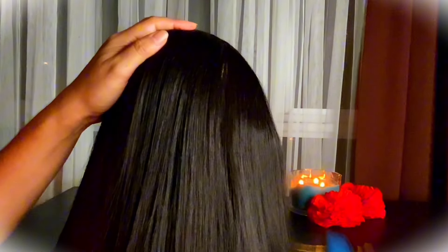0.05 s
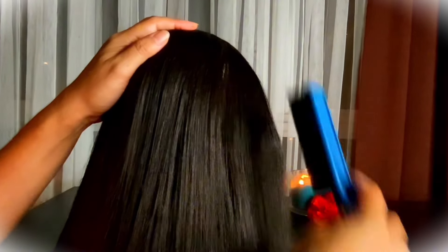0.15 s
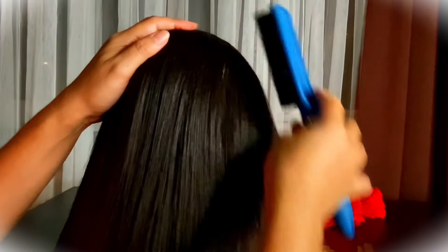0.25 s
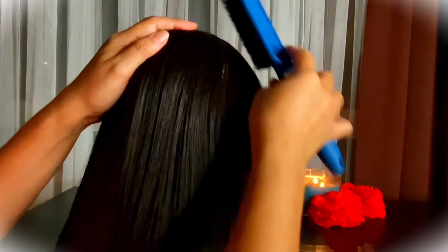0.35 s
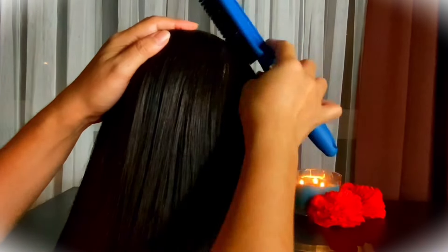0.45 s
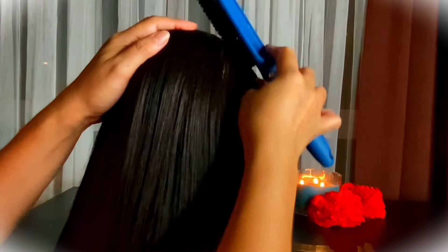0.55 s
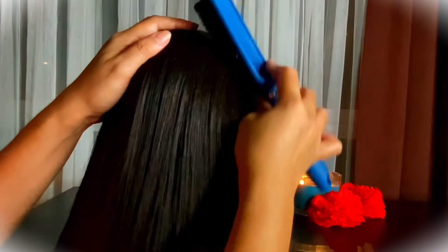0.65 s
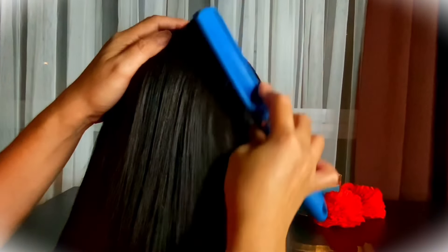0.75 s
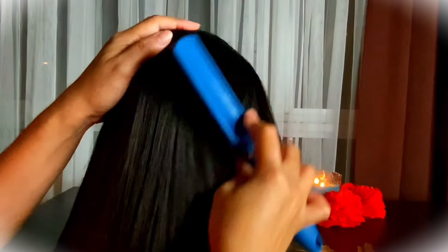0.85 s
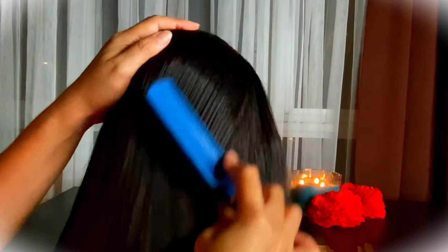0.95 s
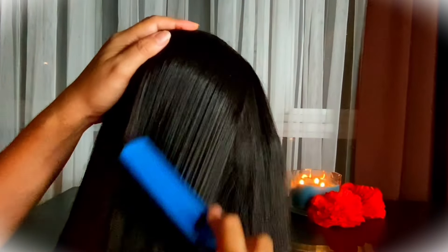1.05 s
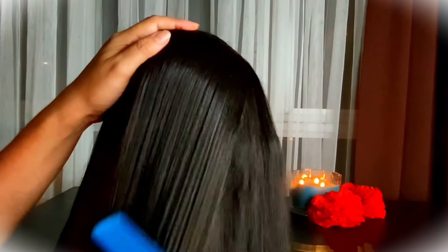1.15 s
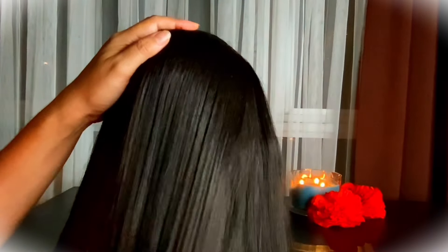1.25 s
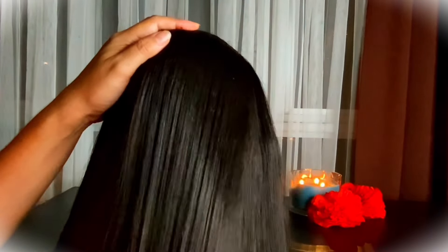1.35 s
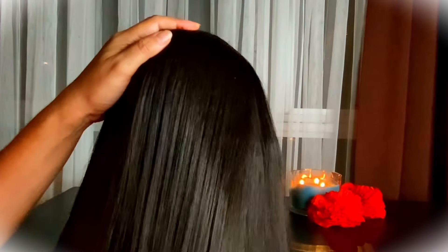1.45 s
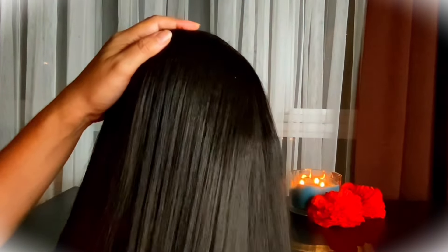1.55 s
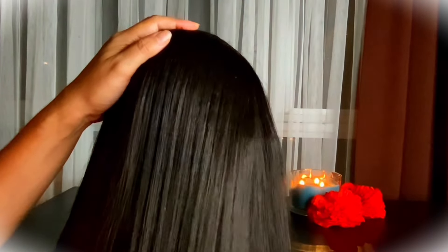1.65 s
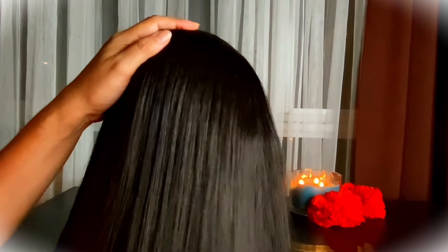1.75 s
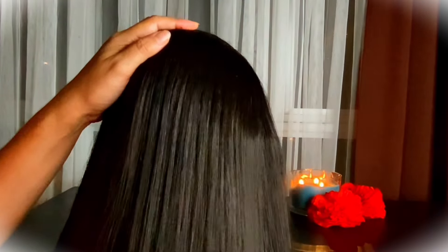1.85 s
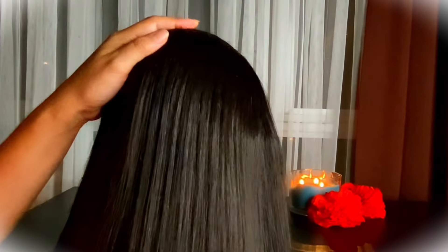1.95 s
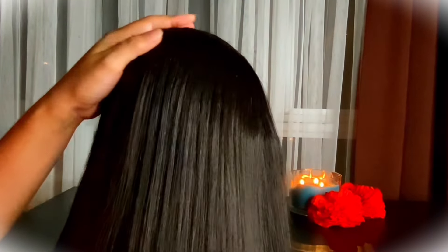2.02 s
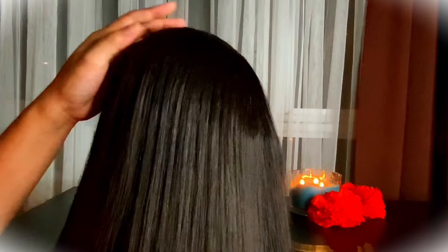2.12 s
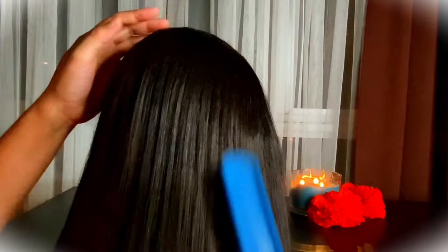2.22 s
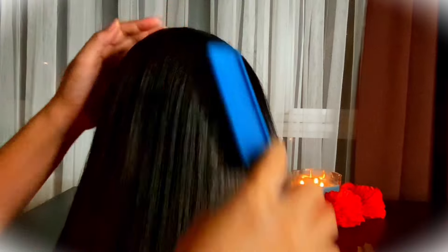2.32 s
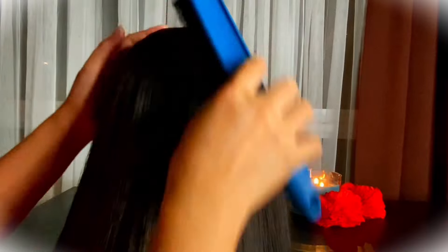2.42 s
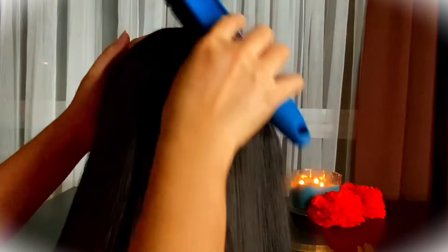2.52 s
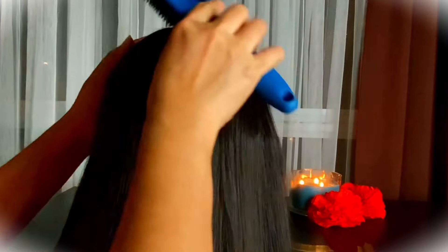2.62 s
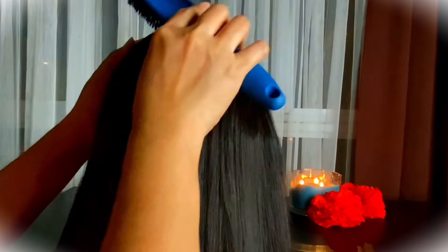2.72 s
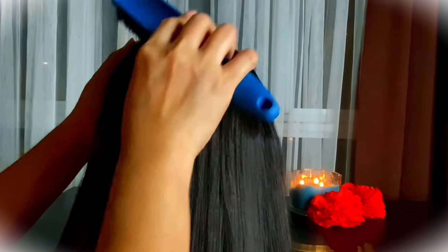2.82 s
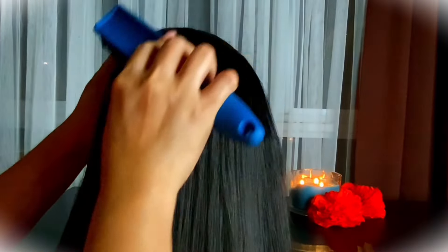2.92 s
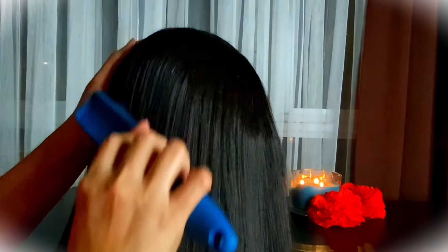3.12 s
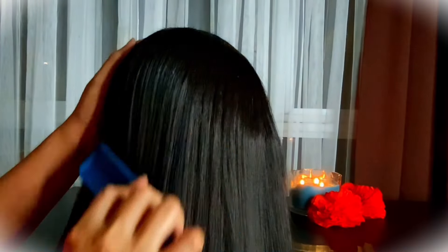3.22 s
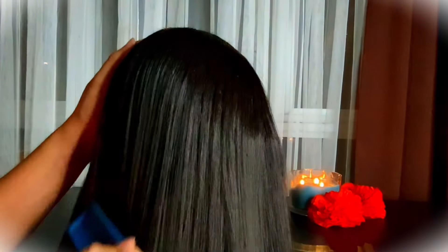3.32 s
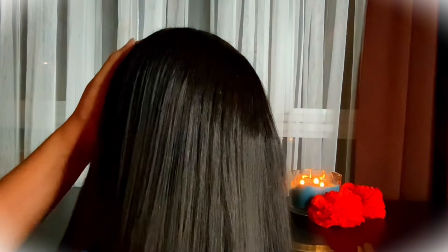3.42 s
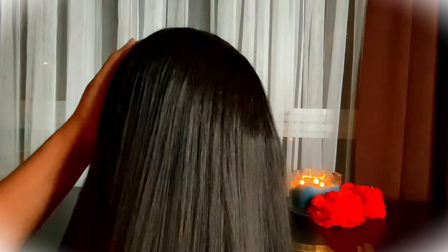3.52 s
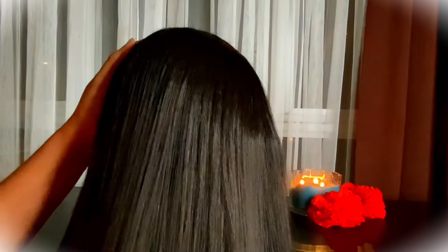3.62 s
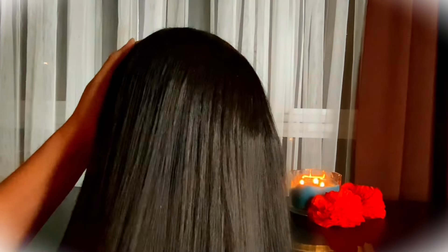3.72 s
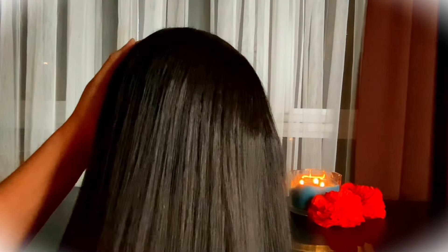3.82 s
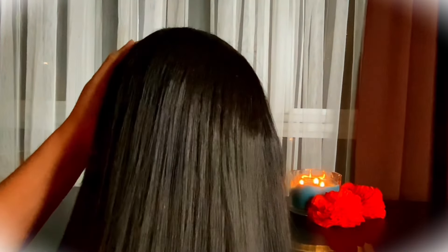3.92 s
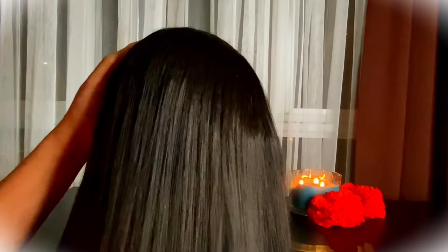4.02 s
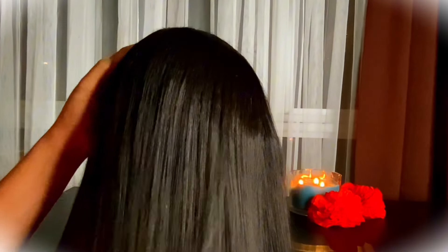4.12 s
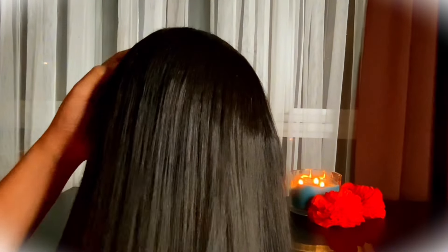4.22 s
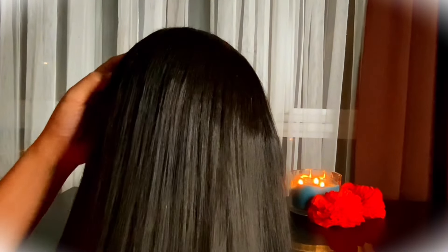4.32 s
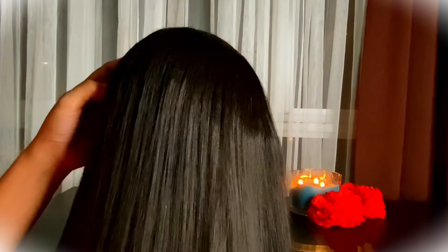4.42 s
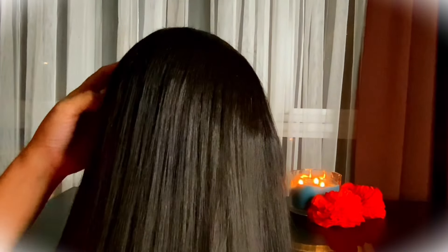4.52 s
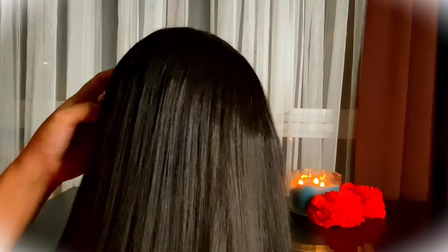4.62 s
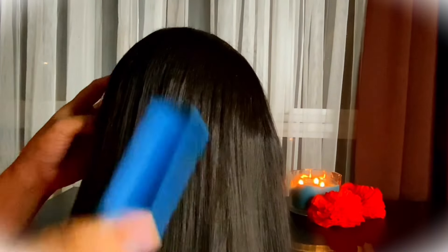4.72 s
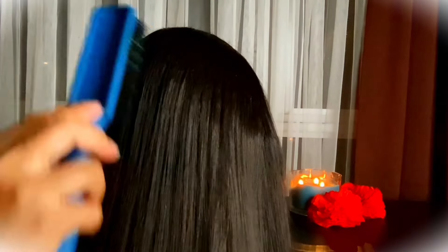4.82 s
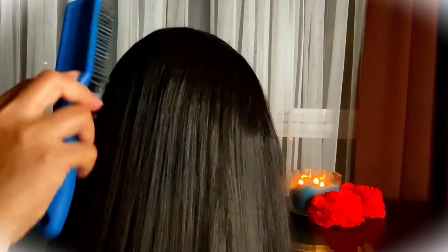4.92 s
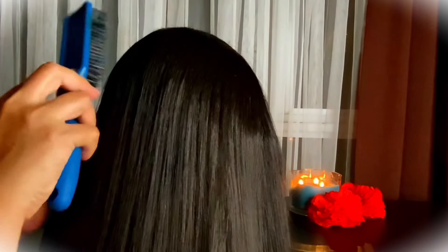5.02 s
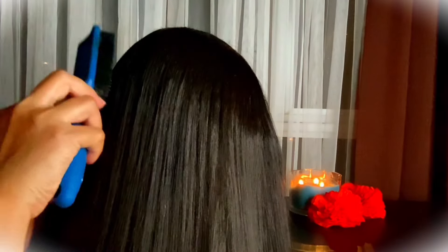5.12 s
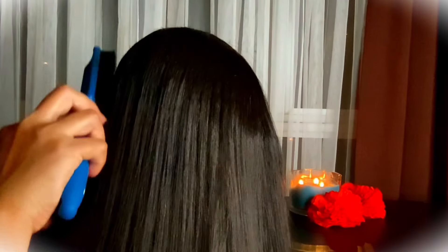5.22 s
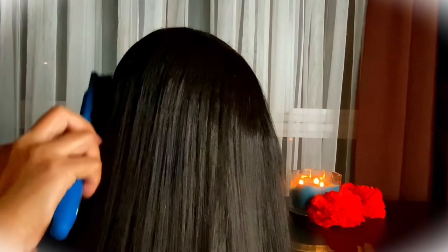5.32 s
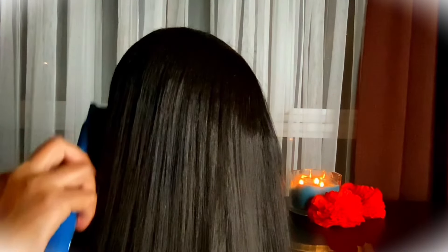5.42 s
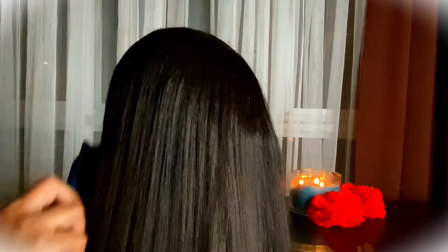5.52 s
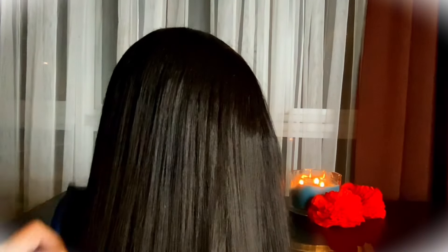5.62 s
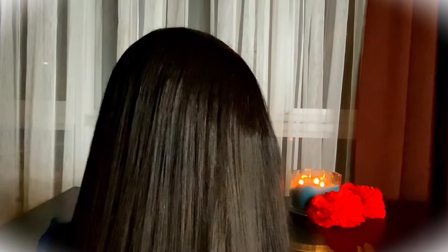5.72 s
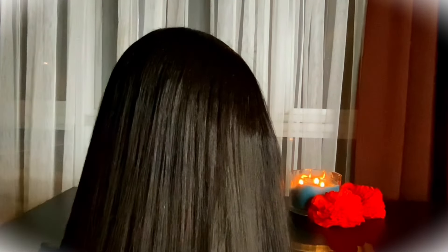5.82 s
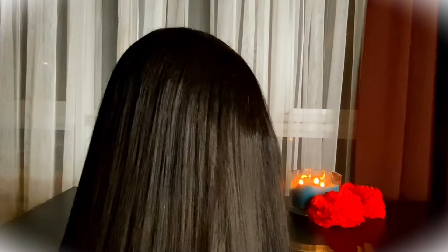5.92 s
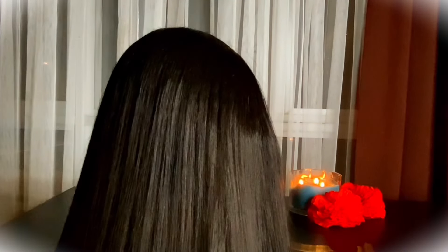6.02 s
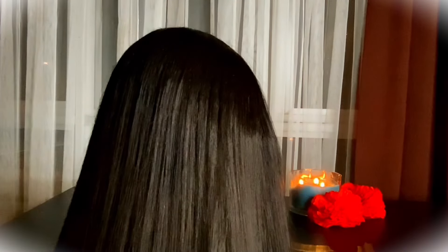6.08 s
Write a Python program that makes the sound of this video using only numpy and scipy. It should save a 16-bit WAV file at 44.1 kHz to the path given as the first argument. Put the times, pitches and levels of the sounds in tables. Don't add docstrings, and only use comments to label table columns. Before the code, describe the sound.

Close stereo hair brushing: a crackly scrape and swish with low thumps, then gentler strokes and tiny plastic knocks over faint hiss and rumble.

```python
import sys
import numpy as np
from scipy import signal
from scipy.fft import rfft, irfft, next_fast_len
from scipy.io import wavfile
from scipy.ndimage import uniform_filter1d, map_coordinates

SR = 44100
rng = np.random.default_rng(int(sys.argv[2]) if len(sys.argv) > 2 else 0)


def transcribe(u):
    v = np.clip(np.atleast_2d(u).T, -1, 1)
    q = np.round(v * 32767).astype(np.int16)
    wavfile.write(sys.argv[1], SR, q)


def decibels_to_gain(level_db):
    exponent = np.asarray(level_db, float) / 20
    return 10 ** exponent


N = 271215


def unit(x):
    return x / np.sqrt(np.mean(x ** 2) + 1e-20)


def curves(rows):
    s, *columns = np.transpose(rows)
    return [np.interp(np.arange(N) / SR, s, column) for column in columns]


def wobble(rate):
    knots = rng.standard_normal(int(N * rate / SR) + 4)
    return map_coordinates(knots, [np.arange(N) * rate / SR])


def filtered(x, response):
    m = next_fast_len(N + SR // 2)
    return irfft(rfft(x, m) * response(np.fft.rfftfreq(m, 1 / SR)), m)[..., :N]


def colour(points):
    f, db = np.transpose(points)
    return lambda hz: decibels_to_gain(np.interp(np.log(hz + 1), np.log(f + 1), db, -120, -120))


def bell(f, centre_hz, width_hz):
    return 1 / (1 + ((f - centre_hz) / width_hz) ** 2)


def modes(rows):
    def response(f):
        total = 0
        for k, (centre, width, db) in enumerate(rows):
            ring = 1j * f * width / (centre * centre - f * f + 1j * f * width)
            total = total + (-1) ** k * decibels_to_gain(db) * ring
        return total
    return response


def ears(pair, alike, pan_db):
    turn = np.arccos(np.clip(alike, -.98, .98)) / 2
    mid, side = np.cos(turn) * pair[0], np.sin(turn) * pair[1]
    gains = decibels_to_gain(np.array([pan_db, -pan_db]) / 2)
    return np.array([mid + side, mid - side]) * gains / np.sqrt((gains ** 2).mean(axis=0))


def slips(rate, spread_db, life, grit, floor):
    chance, size = rng.random((2, N))
    kicks = (chance < rate / SR) * decibels_to_gain(-spread_db * np.log(size + floor))
    return 1 + np.clip(grit, 0, 2) * signal.lfilter([1], [1, -np.exp(-1 / (life * SR))], kicks)


def patches(x, depth_db):
    z = signal.stft(x, nperseg=512)[2]
    field = uniform_filter1d(rng.standard_normal(z.shape[1:]), size=8, axis=0)
    field = uniform_filter1d(field, size=8, axis=1)
    return signal.istft(z * decibels_to_gain(depth_db * unit(field)), nperseg=512)[1][:, :N]


def swells(rows, sharp=1.67):
    t = np.arange(N) / SR
    shapes = []
    for s, length, *_ in rows:
        phase = np.clip((t - s) / length, -.5, .5)
        shapes.append(np.abs(np.cos(np.pi * phase)) ** sharp)
    shapes = np.array(shapes)
    return decibels_to_gain([row[2] for row in rows]) @ shapes, np.array([row[3] for row in rows]), shapes


def add_at(track, start_s, burst):
    first = round(start_s * SR)
    track[:, first:first + burst.shape[-1]] += burst


# pitch_hz, density_db (per Hz)
ROOM_RUMBLE = [(12, -29), (20, -9.5), (81, -6), (116, -25), (210, -24), (241, -23), (388, -29.5),
               (513, -36.5)]
# pitch_hz, density_db (per Hz)
CAPSULE_HISS = [(802, -37), (1480, -42.5), (2020, -44), (13500, -48.5), (16000, -45.5)]


def room():
    noise = patches(rng.standard_normal((2, N)), depth_db=0.9)
    hush = unit(filtered(noise, colour(ROOM_RUMBLE + CAPSULE_HISS)))
    return ears(decibels_to_gain(-53.5) * hush, 0.042, np.full(N, 0.34))


# start_s, pull_db, scalp_db
STROKE_FORCE = [
    [(0.5, -40, -62), (0.508, -43.5, -64.5), (0.604, -49.5, -50.5), (0.678, -47, -50), (0.69, -50, -49.5),
     (0.776, -47, -49.5), (0.93, -44, -50.5), (1.0, -33, -56.5)],
    [(1.0, -34, -60), (1.01, -34, -61), (1.162, -22, -44), (1.3, -28.5, -52.5), (1.348, -22, -45.5),
     (1.588, -35.5, -63), (1.634, -34.5, -62), (1.9, -53.5, -97)],
    [(2.62, -56, -83), (2.678, -56, -68.5), (2.766, -59, -68), (2.784, -50.5, -59), (2.884, -48.5, -54.5),
     (3.0, -56, -53), (3.116, -42, -54.5), (3.15, -47.5, -59.5)],
    [(3.15, -45, -63), (3.464, -41.5, -58.5), (3.712, -46.5, -64), (3.802, -44, -69), (3.88, -52.5, -78),
     (4.038, -50.5, -67), (4.132, -44, -77), (4.22, -51.5, -81)],
]
# start_s, pull_db, scalp_db
HAND_FORCE = [
    [(4.24, -64, -71), (4.32, -55, -70), (4.43, -67, -81), (4.52, -57, -75), (4.64, -65, -78)],
    [(4.76, -55.5, -74), (4.8, -48, -70), (4.89, -72, -69.5), (4.99, -56, -72), (5.12, -57.5, -72),
     (5.4, -54, -69), (5.72, -49, -72), (6.1, -53.5, -67), (6.15, -47, -71)],
]
# start_s, pull_db, scalp_db
REST_FORCE = [
    (0, -63, -107),
    (.42, -59, -72),
    (1.95, -56.5, -77),
    (2.55, -56, -109),
]


def force():
    return curves(sorted(map(tuple, REST_FORCE + sum(STROKE_FORCE + HAND_FORCE, []))))


# pitch_hz, density_db (per Hz)
ROCKING = [(11, -23), (18, 6.5), (54, 1), (86, -3), (125, -16.5), (150, -8), (200, -42), (330, -120)]
# pitch_hz, density_db (per Hz)
HAIR_DRAG = [(65, -35), (110, 3.5), (150, -3), (204, -5), (345, -10.5), (377, -13.5), (900, -26.5),
             (1500, -43), (2400, -120)]
# start_s, length_s, level_db, pan_db
EAR_SWEEPS = [(.94, 0.18, -52, 2), (1.18, 0.22, -32, 10.5), (3.0, 0.3, -57, 1), (3.4, 0.34, -53.5, 7.5),
              (4.32, 0.31, -63.5, 0.5), (4.84, 0.085, -72, 3), (5.98, 0.52, -71.5, 7.5)]


def head():
    rest_pan_db = 1.5
    pull_db = force()[0]

    def drag_level(pull_offset_db):
        return decibels_to_gain(-60.5 + 0.81 * (pull_db + pull_offset_db))

    sweep, sweep_pan_db, shapes = swells(EAR_SWEEPS)
    pan_db = rest_pan_db + (sweep_pan_db - rest_pan_db) @ shapes
    rock = unit(filtered(rng.standard_normal((2, N)), colour(ROCKING)) * decibels_to_gain(1.5 * wobble(12)))
    pressure = (20 * np.log10(drag_level(52.5) + sweep) + 58) / 25
    lumps = slips(rate=22, spread_db=3.0, life=0.005, grit=pressure, floor=0.097)
    drag = unit(filtered(lumps * rng.standard_normal((2, N)), colour(HAIR_DRAG)))
    thin = unit(filtered(drag, lambda f: 1 / (1 + (148 / (f + 1)) ** 4)))
    over_ears = decibels_to_gain(1.0) * (drag_level(51.5) * drag + sweep * thin)
    return ears(decibels_to_gain(pull_db + 1.5) * rock, 0.025, 0.14 * pan_db) + ears(over_ears, 0.17, pan_db)


# start_s, left_push, right_push, length_s,
# swing_share
HEAD_BLOWS = [(0.4365, .085, -.055, .007, 1.9), (1.1685, .3, -.03, .005, .2), (1.1772, .42, .05, .0022, .1),
              (1.2033, .62, -.2, .0022, .1), (1.2480, .12, -.24, .005, .2), (1.2485, .26, -.05, .0016, 0),
              (3.4800, .03, .004, .004, .2), (4.1100, -.022, -.008, .0045, .1),
              (4.1120, .014, .008, .06, 0), (4.7890, -.009, -.007, .006, .5)]
# start_s, level_db, pitch_hz, t60_s
HANDLE_KNOCKS = [(4.789, -38, 630, .017), (4.789, -48, 1630, .008), (.437, -39.5, 390, .037),
                 (.437, -40, 760, .018), (.446, -33, 42, .25), (3.7620, -50, 800, .01),
                 (4.1105, -52, 800, .012), (2.8755, -50, 1700, .008), (2.8905, -41, 1600, .016),
                 (2.8205, -50, 1400, .012), (2.6815, -60, 1700, .01), (4.4555, -48, 2600, .004),
                 (4.458, -54, 430, .02)]
# pitch_hz, t60_s
STAND_SWING = [
    (60, .11),
    (72, .1),
]


def blows():
    out, t = np.zeros((2, N + SR)), np.arange(SR // 5) / SR
    swing = np.array([decibels_to_gain(-60 * t / t60) * np.sin(2 * np.pi * hz * t) for hz, t60 in STAND_SWING])
    for s, left, right, length, share in HEAD_BLOWS:
        push = np.array([[left], [right]])
        add_at(out, s, push * np.sin(np.pi * np.clip(t / length, 0, 1)) ** 2)
        add_at(out, s + .75 * length, -push * share * swing * [[1.1], [1.5]])
    for s, db, hz, t60 in HANDLE_KNOCKS:
        onset = 1 - np.exp(-t / 0.00042)
        add_at(out, s, -decibels_to_gain(db - 60 * t / t60) * np.sin(2 * np.pi * hz * t) * onset)
    return out[:, :N]


# start_s, level_db, low_db, pan_db
STRAND_SNAPS = [(0.372, -47, -21, 13), (0.401, -57, -20, 15), (0.438, -53, 10, -5), (.4528, -43, -13.5, 17),
                (0.519, -53, -6, -14), (1.201, -35, -.5, 14), (1.2488, -24, -5.5, 6), (1.358, -23, -25, 1),
                (1.488, -31, -6, 0), (1.517, -34, -22, 0), (1.575, -32.5, -10, 2), (1.7627, -66, 11, -3),
                (2.81, -41.5, -11, -3), (2.89, -35, -3, -6), (3.642, -32.5, -29, 9), (3.6509, -33, -14, 6),
                (3.684, -39, -28, 8), (3.7617, -31.5, -14.5, 8.5), (3.9091, -42, -13, 5),
                (4.021, -48.5, -1.5, 8), (4.109, -44, -3.5, 4), (4.4548, -43, -7.5, 2),
                (5.6226, -37.5, -12, 7)]


def snaps():
    low, mid, top = np.zeros((3, 2, N + SR))
    t = np.arange(SR // 100) / SR
    draw = rng.standard_normal((len(STRAND_SNAPS), 3, len(t)))
    for (s, db, low_db, pan_db), (both, *own) in zip(STRAND_SNAPS, draw):
        own = np.array(own)
        gains = decibels_to_gain([[db + pan_db / 2], [db - pan_db / 2]])
        click = gains * (3.5 * (t == 0) + 0.65 * (both + .5 * own) * decibels_to_gain(-60 * t / 0.0054))
        puff = gains * (5.0 * (t == 0) + 0.49 * both + 0.072 * own) * decibels_to_gain(-60 * t / 0.02)
        add_at(low, s + .0013, decibels_to_gain(low_db + 6.0) * puff)
        add_at(mid, s + .0013, click)
        add_at(top, s + .0013, decibels_to_gain(-6.0) * click)

    def band(x, low_hz, high_hz):
        sos = signal.butter(2, [low_hz, high_hz], "band", fs=SR, output="sos")
        return signal.sosfilt(sos, x[:, :N])

    return 1.01 * (band(low, 530, 2900) + band(mid, 3200, 10900) + band(top, 11700, 13300))


# start_s, level_db, pitch_hz, pan_db
BRISTLE_FLICKS = [(0.3663, -65, 13700, 6), (0.3702, -63, 13900, 5), (0.4106, -56, 8600, 7),
                  (0.5254, -50, 7600, -10), (0.5651, -47.5, 2230, -8), (0.7043, -42.5, 7300, -3),
                  (0.7689, -44.5, 7000, -9), (0.806, -34.5, 6200, -14.5), (0.8392, -38.5, 6840, -18),
                  (0.8497, -37.5, 7150, -17), (0.8824, -43, 7300, -28), (0.8962, -33.5, 6800, -16),
                  (1.1785, -23, 8300, 10.5), (1.302, -34, 2700, -4), (1.321, -33, 3560, -7),
                  (1.346, -29.5, 4450, -6), (1.374, -35, 5640, -15), (1.4078, -37, 6600, 0),
                  (1.4487, -30, 9800, -9), (1.4522, -33, 4170, -3.5), (1.4885, -37, 6850, -3),
                  (1.5009, -38, 7700, -6), (1.6082, -41, 5330, 3), (1.6546, -42.5, 5700, 5),
                  (1.683, -48, 5600, -5), (1.7654, -69, 2200, -6), (1.8105, -53, 3730, -9),
                  (1.8137, -54.5, 3000, -2),
                  (2.7546, -53, 2200, -13), (2.782, -54, 2580, -11), (2.817, -46, 8100, 0),
                (2.866, -48, 7800, -2), (2.8779, -51, 2220, -11), (2.8972, -46.5, 7100, -16),
                (2.974, -45, 3060, -3), (3.0485, -48, 2160, -5), (3.4439, -42.5, 7400, 9),
                (3.4674, -41.5, 8700, 11.5), (3.519, -42.5, 12700, 10), (3.566, -39, 14600, 9),
                (3.5741, -47, 5400, 3), (3.5993, -46, 6800, -3), (3.6459, -41.5, 9100, -1),
                (3.664, -48, 7300, 3), (3.6906, -38, 13800, 5.5), (3.6985, -44, 10000, 0),
                (3.792, -49, 8700, 3), (3.8114, -55, 6400, -1), (3.8317, -52, 7000, -1),
                (3.9216, -57, 7300, -4), (4.0144, -49, 8100, 1), (4.6754, -55.5, 5600, 1),
                (4.6832, -51.5, 8400, -1), (4.7895, -62, 2200, -2), (4.793, -59, 2180, 6),
                (5.9972, -54, 7100, 0), (6.0104, -56, 4830, 6), (6.096, -56.5, 4500, 5)]


def flicks():
    out, t = np.zeros((2, N + SR)), np.arange(SR // 200) / SR
    rows = BRISTLE_FLICKS
    for (s, db, hz, pan_db), noise in zip(rows, rng.standard_normal((len(rows), len(t)))):
        ring = np.sin(2 * np.pi * hz * t) * np.exp(-t * hz / 3.5)
        crack = .9 * np.diff(noise, prepend=0) / 2 * np.exp(-t / .0007)
        flick = ring + crack
        flick /= np.sqrt(np.sum(flick ** 2) / (SR / 10 ** 3))
        add_at(out, s - .0003, decibels_to_gain([[db - 6 + pan_db / 2], [db - 6 - pan_db / 2]]) * flick)
    return out[:, :N]


# start_s, left_lag_ms, likeness (-1 to 1), grit (0 to 2)
BRUSH_PLACE = [(0.55, .07, .4, .4), (0.75, .06, .35, .4), (0.82, -.042, .55, .4), (1.14, -.048, .5, .3),
               (1.22, -.008, .55, .8), (1.30, 0, .85, 1.0), (1.56, .034, .8, .9), (2.70, -.052, .8, .5),
               (2.95, -.056, .85, .7), (3.20, -.056, .45, .2), (3.38, -.025, .22, .2),
               (3.50, -.005, .6, .4), (3.68, 0, .72, .9), (4.05, .028, .7, .5), (4.50, .004, .88, .2),
               (4.90, -.03, -.5, .2), (5.60, -.03, -.52, .2), (5.90, -.006, -.55, .2)]
# pitch_hz, level_db
RIGHT_EAR_SHADE = [(20, -3), (3600, 2.5), (5300, 1.5), (7300, 1.5), (8800, -1), (10300, -1), (13000, -1),
                   (22050, -4)]


def arrive(pair):
    hz, t, z = signal.stft(pair, SR, nperseg=256)
    s, lag_ms = np.transpose(BRUSH_PLACE)[:2]
    half = np.exp(-1j * np.pi * np.outer(hz, np.interp(t, s, lag_ms)) / 10 ** 3)
    shade = np.sqrt(colour(RIGHT_EAR_SHADE)(hz))[:, None]
    return signal.istft(z * [half / shade, half.conj() * shade], SR, nperseg=256)[1][:, :N]


# start_s, speed_db, brightness_db, pan_db
FIRST_STROKE = [
    [(.47, -83, -3, -4), (.51, -71.5, -10, -2), (.58, -59.5, -5, -2), (.66, -52, -8, -2.5),
     (.75, -51, -9, -3.5), (.85, -49, -9, -1.5), (.94, -47, -4, -3), (1.0, -50, -1, -2)],
    [(1.07, -45, -3, -0.5), (1.2, -40.5, -0.5, 5.5), (1.3, -46, -0.5, -1), (1.38, -42.5, -2.5, -0.5),
     (1.44, -46, 1, -0.5), (1.49, -53, -3, 0.5), (1.57, -57.5, -4, -0.5), (1.66, -59, -13, -0.5),
     (1.77, -79, -3, 1)],
]
SECOND_STROKE = [
    [(2.68, -82, -2, 0), (2.78, -64.5, -18, -2), (2.88, -56, -7, 0.5), (2.98, -54.5, -10, 0.5),
     (3.08, -52, -5, 2), (3.18, -52.5, -2, 2.5)],
    [(3.28, -51.5, -3.5, 7), (3.38, -50, -1.5, 9.7), (3.48, -51.5, -1, 8.5), (3.57, -55, -3, 7.5),
     (3.74, -60, 1, 6), (3.85, -65.5, -3, 7), (3.93, -66, -0.5, 5), (4.05, -64, -3, 1.6),
     (4.14, -77, -6, 1)],
]
THIRD_STROKE = [
    [(4.76, -72, 1, 2), (5.0, -68.5, 1, 2.7), (5.2, -66.5, 2.5, 3.7), (5.35, -64.5, 2, 2.5),
     (5.52, -59, -0.5, 5), (5.65, -59.5, 0, 3.1), (5.84, -61.5, -4.5, 3.6), (6.03, -61, -4.5, 6),
     (6.15, -63, -3, 7)],
]
# level_db, pan_shift_db
STROKE_GRIP = [
    (-7, 1.5),
    (-5.5, 3),
    (-2.5, 8),
]
# start_s, length_s, level_db, pan_db
HAIR_RUSTLES = [(.3, 0.33, -92, 1), (2.02, 0.077, -82, -1), (4.607, 0.094, -64, -2),
                (4.69, 0.077, -69.5, 0)]


def strokes():
    still_db, settle_s = -85, 0.044
    rows = []
    for stroke, grip in zip((FIRST_STROKE, SECOND_STROKE, THIRD_STROKE), STROKE_GRIP):
        path = [(*row, *grip) for part in stroke for row in part]
        before = (path[0][0] - settle_s, still_db, *path[0][2:])
        after = (path[-1][0] + settle_s, still_db, *path[-1][2:])
        rows += [before] + path + [after]
    speed_db, bright_db, pan_db, grip_db, shift_db = curves(rows)
    rustle, rustle_pan_db, shapes = swells(HAIR_RUSTLES, sharp=.6)
    pan_db = pan_db * (1 - shapes.sum(axis=0)) + rustle_pan_db @ shapes
    bite_db = 7 * curves(BRUSH_PLACE)[2] - 0.15 * bright_db
    bristle = decibels_to_gain(speed_db + grip_db + bite_db) + decibels_to_gain(-10) * rustle
    strand = decibels_to_gain(speed_db) + rustle
    tip = decibels_to_gain(speed_db + bright_db) + decibels_to_gain(1) * rustle
    return bristle, strand, tip, pan_db + shift_db, pan_db


def friction():
    grit = curves(BRUSH_PLACE)[2]
    catch = slips(rate=320, spread_db=6.5, life=0.00086, grit=.55 * grit, floor=0.27)
    catch = catch * decibels_to_gain(0.36 * wobble(24.72) + 0.42 * wobble(9))
    return patches(catch * rng.standard_normal((4, N)), depth_db=1.26).reshape(2, 2, N)


# pitch_hz, width_hz, level_db
SHELL_FRONT = [(370, 200, 3.5), (450, 23, 6), (660, 160, -8), (980, 440, 4.5), (1406, 350, 6),
               (1884, 460, 2), (2285, 470, 2)]
# pitch_hz, width_hz, level_db
SHELL_REAR = [(368, 102, 6.5), (490, 63, 7.5), (637, 210, 3.5), (1076, 350, 3), (1430, 330, 3),
              (1880, 360, 1), (2410, 540, -2)]
# start_s, tilt_db
LANDING_TILT = [(.7, -1.5), (.85, -.5), (1.1, 0), (2.6, 2), (3.15, 2), (3.3, .5)]
# start_s, length_s, level_db, pan_db
FINGER_RUBS = [(4.27, 0.081, -65, 7), (4.33, 0.1, -69, 2), (4.38, 0.047, -80, 1), (4.43, 0.16, -68, 2)]


def hollow_head(scalp):
    front = unit(filtered(scalp, modes(SHELL_FRONT)))
    rear = unit(filtered(scalp, modes(SHELL_REAR)))
    shell = np.where(np.arange(N) < 2.3 * SR, front, rear)
    shell = filtered(shell, lambda f: 1 / (1 + (280 / (f + 1)) ** 4) / (1 + (f / 2900) ** 6))
    shell = filtered(shell, lambda f: 1 - .75 * bell(f, 1290, 55))
    scrape = unit(shell)
    lower = filtered(scrape, lambda f: f < 1200)
    tilt = decibels_to_gain(curves(LANDING_TILT)[0])
    pads = unit(filtered(shell, lambda f: 1 / (1 + (f / 1110) ** 4)))
    scrape = decibels_to_gain(force()[1] - 0.1) * (lower / tilt + (scrape - lower) * tilt)
    return scrape + swells(FINGER_RUBS)[0] * pads


# pitch_hz, density_db (per Hz)
BRISTLE_COLOUR = [(1400, -15), (2200, -3.5), (2700, 1), (3300, 0), (4500, 1.5), (5600, -3), (7000, -23.5)]
STRAND_COLOUR = [(4800, -16), (6200, -2), (7100, 0.5), (8600, 1), (9700, -5.5), (11000, -21)]
TIP_COLOUR = [(9200, -19), (11000, -9.5), (12400, -8.5), (14000, -10), (15800, -12.5)]
# start_s, damping_share (0 to 1), tines_db
PAD_CONTACT = [(.5, .7, 0), (1.08, .6, 0), (1.18, .05, 0), (2.6, .6, -6), (3.0, .6, -5), (3.2, .05, 0),
               (3.45, .05, 0), (4.8, .05, -2), (5.4, .05, 0), (5.7, .05, 1), (6.1, .05, 0)]


def brush():
    bristle, strand, tip, pan_db, high_pan_db = strokes()
    alike = curves(BRUSH_PLACE)[1]
    damping, tines_db = curves(PAD_CONTACT)
    grains, scalp = friction()

    def air(points):
        return unit(filtered(grains, colour(points)))

    tines = filtered(air(BRISTLE_COLOUR), lambda f: 1 + 0.39 * bell(f, 3250, 215))
    tines = tines - np.clip(damping, 0, 1) * filtered(tines, lambda f: bell(f, 4170, 230))
    in_air = ears(bristle * decibels_to_gain(tines_db) * tines, 1.22 * alike, pan_db)
    in_air += ears(strand * air(STRAND_COLOUR) + tip * air(TIP_COLOUR), alike, high_pan_db)
    return arrive(in_air + snaps() + flicks()) + ears(hollow_head(scalp), 0.82, pan_db)


def scene():
    return room() + head() + blows() + brush()


def top_cut(x):
    return signal.sosfilt(signal.butter(12, 16550, fs=SR, output="sos"), x)


def record(dry):
    mix = filtered(dry, lambda f: 1j * f / (12 + 1j * f))
    return top_cut(mix)


dry = scene()
out = record(dry)
transcribe(out)
```